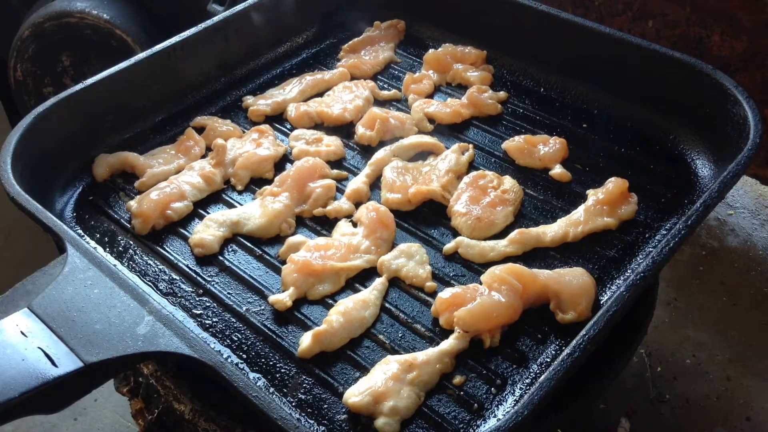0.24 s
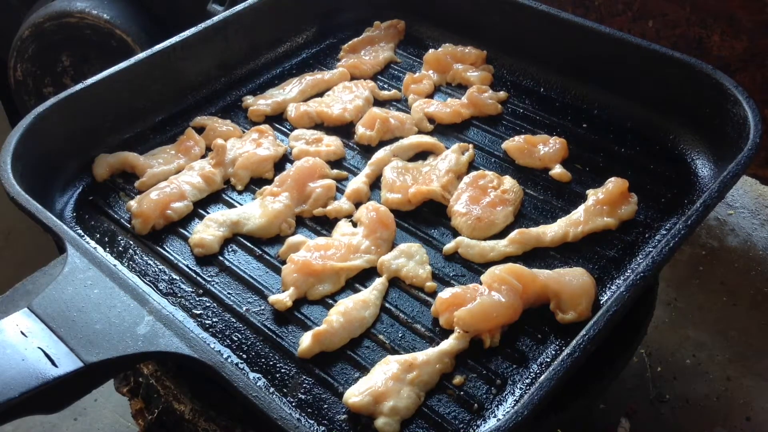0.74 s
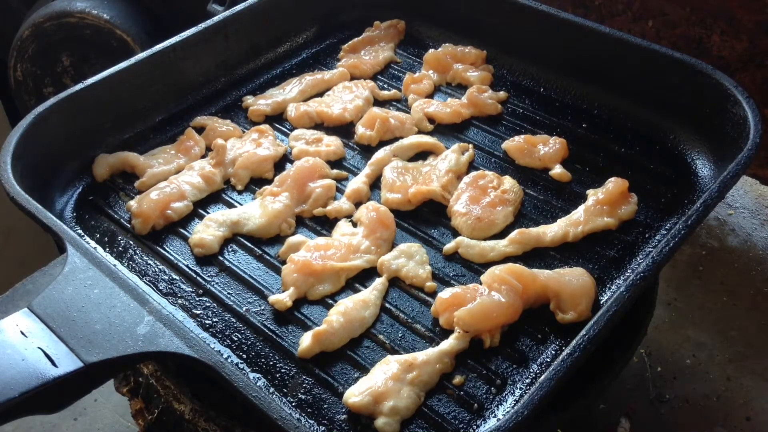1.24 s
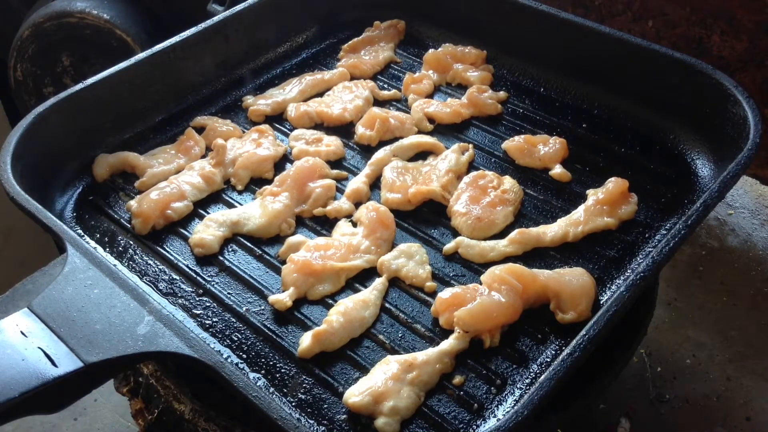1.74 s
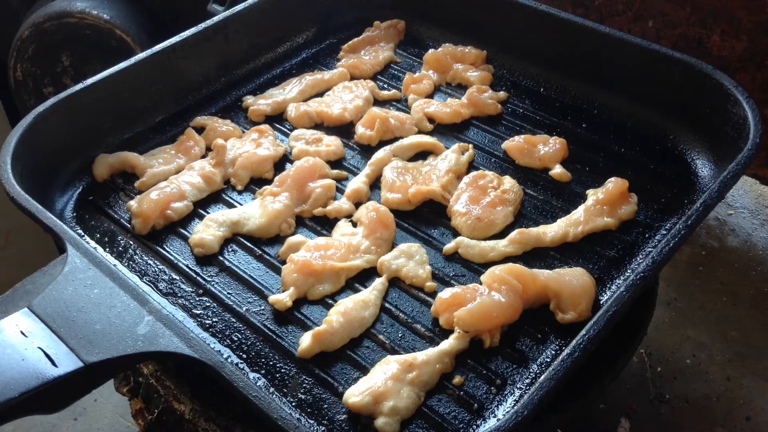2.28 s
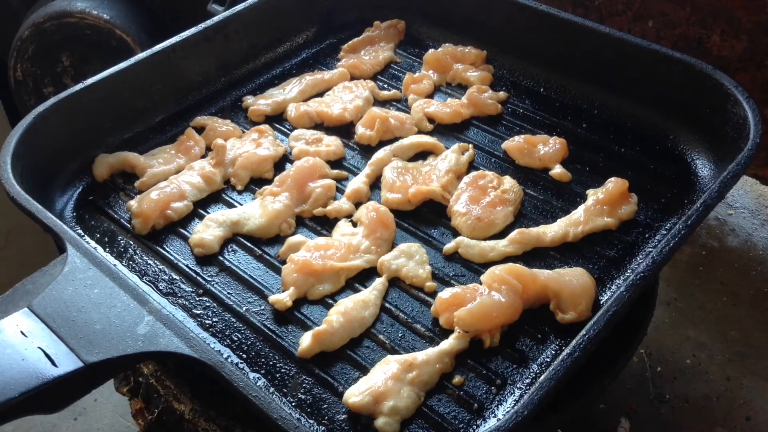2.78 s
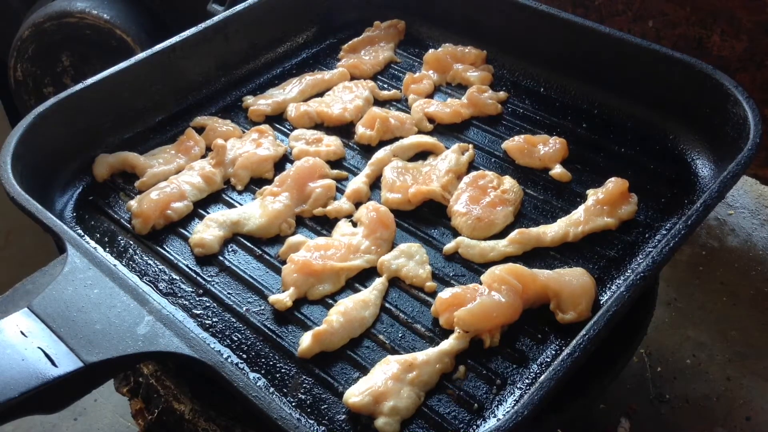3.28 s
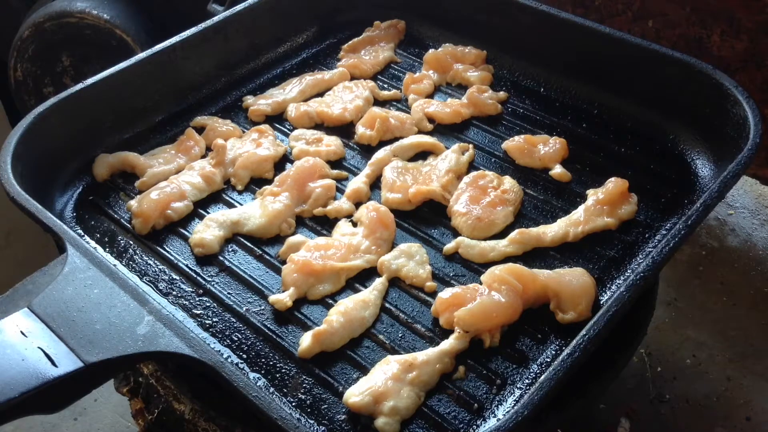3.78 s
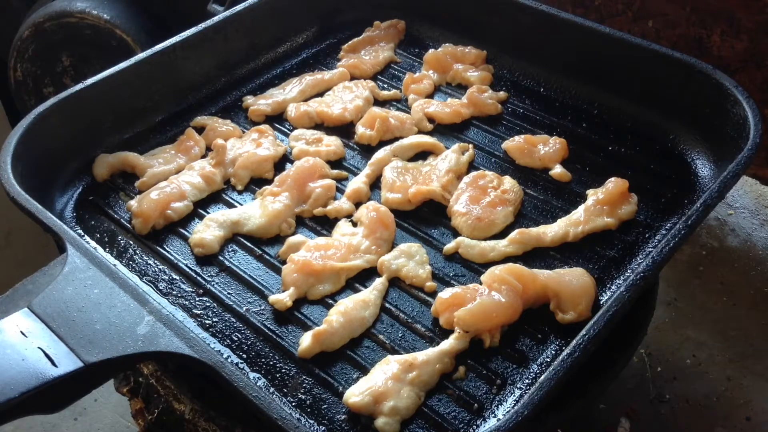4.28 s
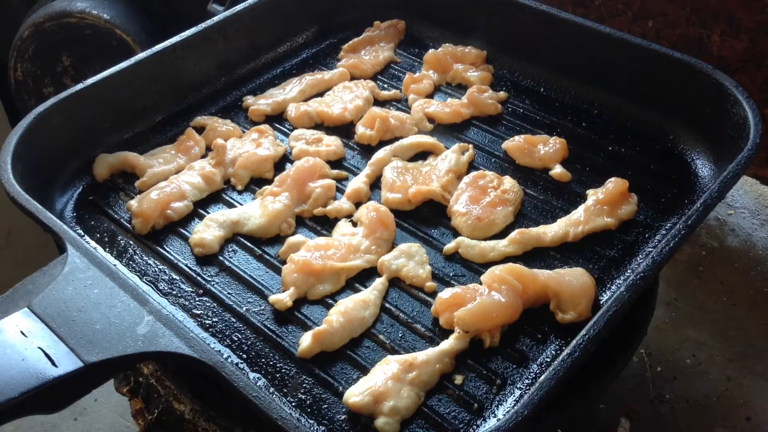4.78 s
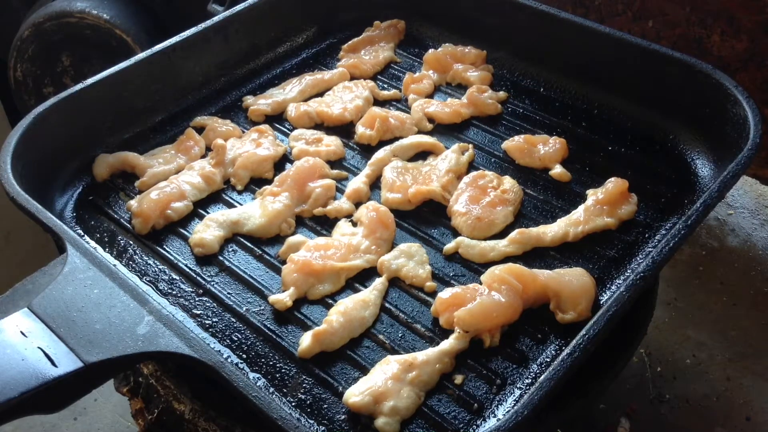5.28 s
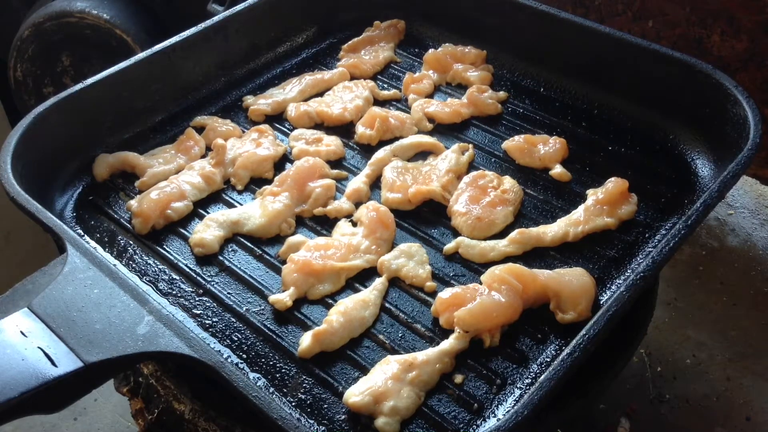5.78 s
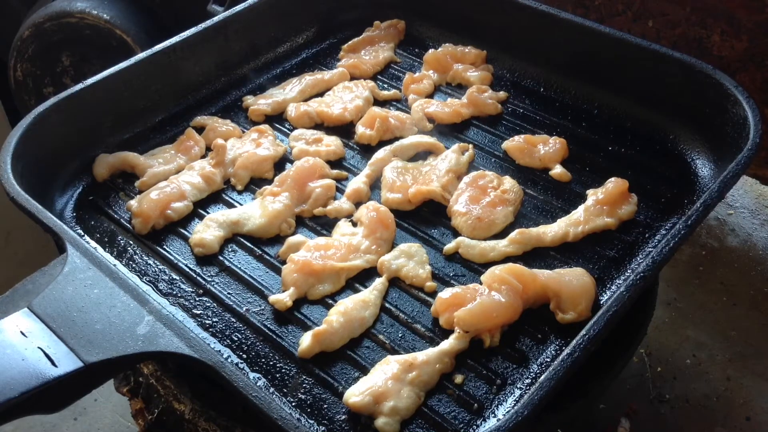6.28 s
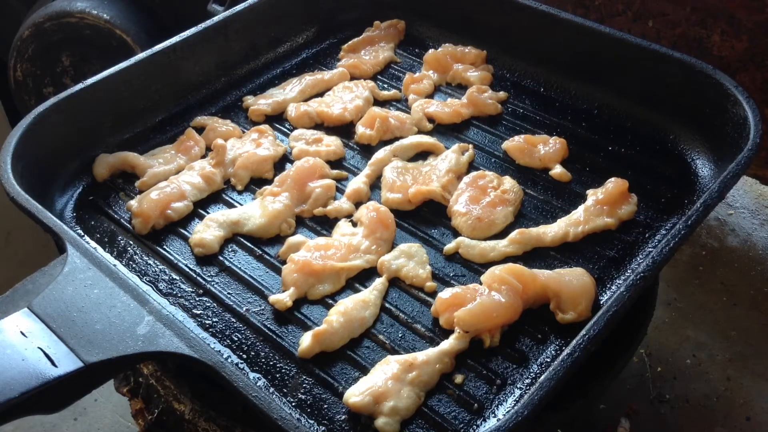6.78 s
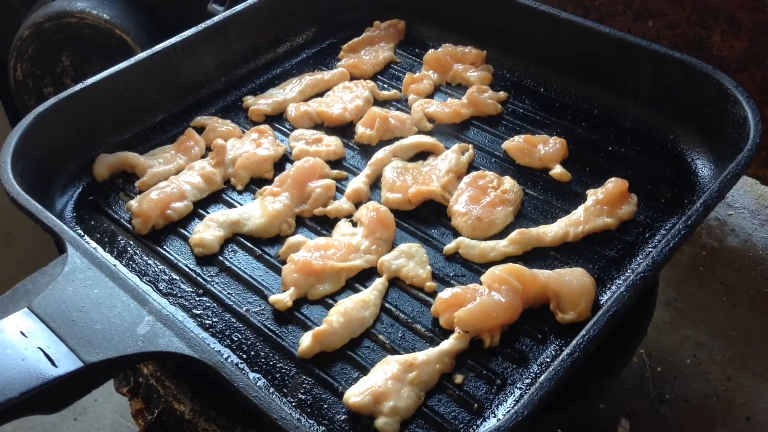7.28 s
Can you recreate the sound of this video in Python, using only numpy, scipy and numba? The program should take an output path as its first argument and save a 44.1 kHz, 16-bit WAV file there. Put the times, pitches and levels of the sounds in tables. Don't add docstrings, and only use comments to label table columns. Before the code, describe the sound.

For about seven and a half seconds, meat fries on a hot pan with the microphone close above it in a small kitchen. A bright, dense, steady sizzle fills the sound, mostly high steam hiss and countless bursting bubbles, fluttering in quick irregular gusts. Tiny ticks and sharp spits crackle constantly. Strong snaps stand out at 0.9 and 1.5 seconds; from 2.0 to 2.5 they crowd into a violent flurry, with splattery, clipped explosions. Another harsh pop lands at 3.0, then one at 3.1 makes the whole level duck and recover over about a second. The calmer stretch holds a soft, distant wooden knock at 4.5, while a faint wavering motor hum hides underneath. Boiling strengthens around 5.1, with a hard pop at 5.5. After an easing near 6.4, a snap at 6.7 causes a lighter dip, and sizzling continues undiminished. A very quiet low flame roar stays beneath.

```python
import sys
import numpy as np
from scipy import signal
from scipy.fft import rfft, irfft
from scipy.io import wavfile
from scipy.ndimage import uniform_filter1d
from numba import njit

SR = 44100
rng = np.random.default_rng(int(sys.argv[2]) if len(sys.argv) > 2 else 0)


def transcribe(u):
    v = np.clip(np.atleast_2d(u).T, -1, 1)
    q = np.round(v * 32767).astype(np.int16)
    wavfile.write(sys.argv[1], SR, q)


def field_ratio(decibels):
    return 10 ** (np.asarray(decibels, dtype=float) / 20)


N = 332514


def level(x, db):
    return x * field_ratio(db) / np.sqrt(np.mean(x ** 2))


def colour(x, table):
    hz, db = np.transpose(table)
    f = np.maximum(np.arange(4097) * SR / 8192, 1)
    cepstrum = irfft(np.log(field_ratio(np.interp(np.log(f), np.log(hz), db))))
    cepstrum[1:4096] *= 2
    cepstrum[4097:] = 0
    response = irfft(np.exp(rfft(cepstrum)))
    return signal.fftconvolve(x, response)[:N]


def walk(rate):
    hold = max(int(SR / rate), 2)
    steps = np.repeat(rng.standard_normal(N // hold + 1), hold)
    return 1.3 * uniform_filter1d(uniform_filter1d(steps, hold), hold)[:N]


@njit
def bursts(at, hz, size, rise, ring):
    out = np.zeros(N)
    for k in range(len(at)):
        first = max(int(at[k] - 4 * rise * SR / hz[k]), 0)
        last = min(int(at[k] + 6 * ring[k] * SR / hz[k]) + 1, N)
        for i in range(first, last):
            turns = (i - at[k]) * hz[k] / SR
            fade = np.exp(-(turns / rise) ** 2) if turns < 0 else np.exp(-turns / ring[k])
            out[i] -= size[k] * fade * np.cos(2 * np.pi * turns)
    return out


def drone():
    # (time [s], level [dB])
    swell = [
        (3.8, -63),
        (4.69, -55),
        (4.82, -72),
        (4.96, -58),
        (5.3, -63),
        (5.47, -52),
        (5.61, -81),
        (5.81, -57),
        (7.54, -69),
    ]
    s, db = np.transpose(swell)
    t = np.arange(N) / SR
    start_hz, sag_hz_per_s = 193.7, 2.5
    steady_hz = start_hz - sag_hz_per_s * (t - s[0])
    hz = steady_hz * (1 + 0.0197 * walk(6) + 0.013 * walk(15))
    level_db = np.interp(t, s, db, left=-90) + 2.0 * walk(5.74)
    return np.sqrt(2) * field_ratio(level_db) * np.sin(2 * np.pi * np.cumsum(hz) / SR)


def knock():
    # (time [s], peak [dB], pitch [Hz], ring [cycles])
    modes = [
        (4.536, -28, 300, 1),
        (4.5395, -27, 850, 2.5),
        (4.54, -31, 650, 1.3),
        (4.55, -35.5, 480, 9.7),
        (4.55, -41, 250, 3),
        (4.563, -33, 340, 2.7),
        (4.577, -35, 312, 3),
        (4.592, -41, 302, 5.5),
    ]
    s, db, hz, cycles = np.transpose(modes)
    return bursts(s * SR, hz, field_ratio(db + .5), 1.0, cycles)


def flame():
    # (frequency [Hz], level [dB])
    roar = [(35, -52), (60, -21), (102, -24), (133, -2.5), (184, 2.5), (238, 2), (269, -4.5), (328, -3),
            (371, -5.5), (413, -18), (430, -13), (560, -31), (950, -120)]
    return level(colour(rng.standard_normal(N), roar), -53.5) * field_ratio(0.35 * walk(6.6))


def boil_db():
    # (time [s], level [dB])
    heat = [(0.0, -21), (.45, -20), (.9, -20.9), (1.5, -19.5), (2.4, -19), (2.8, -21.5), (3.06, -19.5),
            (3.1, -23.5), (3.5, -22), (4.1, -21.2), (4.95, -20), (5.1, -18.5), (5.3, -20.5), (5.5, -19),
            (5.65, -20.5), (6.4, -21.5), (6.62, -19.5), (7.54, -19.5)]
    s, db = np.transpose(heat)
    return np.interp(np.arange(N) / SR, s, db) + 0.43 * walk(12)


def fizz(heat_db, count=30000):
    # (frequency [Hz], level [dB])
    sizzle = [(240, -60), (400, -27.5), (425, -37.5), (488, -21.5), (568, -14.5), (736, -13), (1250, -9.5),
              (1420, -12), (1980, -8), (3870, -4.5), (5580, -2), (6800, -2.5), (9950, 0.5), (13700, -1.5),
              (15200, -4)]
    spots, lowest_hz, span_hz, crowding = 6, 450, 19000, 1.6
    when, pitch, luck, life = rng.random((count, 4)).T
    at = when * (N - 1)
    moment = at.astype(int)
    hz = lowest_hz + span_hz * pitch ** crowding
    size_db = np.minimum(-3.5 * np.log(1 - luck), 10.5)

    gust_db = .5 * walk(30) + 1.2 * walk(250)
    patch_db = np.array([0.96 * walk(11) + 0.98 * walk(70) for _ in range(spots)])
    patch_db[0] -= 0.4 * (heat_db - heat_db.mean())
    spot = (spots * pitch).astype(int)

    even = np.sqrt(hz * (pitch + .05) ** .6)
    size = field_ratio(size_db + gust_db[moment] + patch_db[spot, moment]) * even
    swarm = bursts(at, np.minimum(hz, .45 * SR), size, 0.3, 0.22 + 0.91 * life ** 2)

    jet = rfft(rng.standard_normal(N))
    edges_hz = lowest_hz + span_hz * (np.arange(1, spots) / spots) ** crowding
    band = np.searchsorted(edges_hz, np.arange(len(jet)) * SR / N)
    steam = np.zeros(N)
    for k in range(spots):
        steam += irfft(jet * (band == k), N) * field_ratio(0.3 * (gust_db + patch_db[k]))
    mixed = level(swarm, 0) + level(steam, 1.5)
    return field_ratio(heat_db) * level(colour(mixed, sizzle), -0.41)


def duck_db():
    # (time [s], depth [dB])
    ducks = [
        (3.0872, 3.5),
        (6.6957, 2.0),
    ]
    recover_s = 1
    t = np.arange(N) / SR
    return -sum(depth_db * (t > s) * np.exp(-np.abs(t - s) / recover_s) for s, depth_db in ducks)


def crowd(heat_db, loud, per_s, over_db, scatter_db, centre_hz, octaves):
    count = int(per_s * N / SR)
    s = .01 + rng.random(count) * (N / SR - .02)
    luck, pitch = rng.standard_normal((count, 2)).T
    peak_db = (heat_db + duck_db())[(s * SR).astype(int)] + over_db + scatter_db * luck
    return np.vstack([loud, np.transpose([s, peak_db, centre_hz * 2 ** (octaves * pitch)])])


def pan_tail(s, hz, size, spread_s, tail_db, count=8):
    late, shift, sign = rng.random((len(s), count, 3)).transpose(2, 0, 1)
    delay = -spread_s * np.log(1 - late) + .0002
    small = size[:, None] * field_ratio(tail_db) * np.exp(-delay / (2 * spread_s)) * (2 * sign - 1)
    tail_hz = hz[:, None] * 2 ** (0.83 * shift - .6)
    return (s[:, None] + delay).ravel(), tail_hz.ravel(), small.ravel()


def spits(table, gain_db, rise, ring, tail_db):
    s, peak_db, hz = np.transpose(table)
    size = field_ratio(peak_db + gain_db - duck_db()[(s * SR).astype(int) - 20])
    tail_s, tail_hz, tail_size = pan_tail(s, hz, size, 0.0013, tail_db)
    s, hz, size = np.append(s, tail_s), np.append(hz, tail_hz), np.append(size, tail_size)
    rings = ring * (1 + rng.random(len(s)))
    pops = bursts(s * SR, np.minimum(hz, .45 * SR), size, rise, rings)
    return signal.sosfilt(signal.butter(3, 600, "high", fs=SR, output="sos"), pops)


def ticks(heat_db):
    table = crowd(heat_db, np.empty((0, 3)), per_s=22, over_db=12, scatter_db=2.4,
                  centre_hz=13800, octaves=.1)
    return spits(table, gain_db=0, rise=.8, ring=.8, tail_db=-9)


def deep_spits(heat_db):
    # (time [s], peak [dB], bubble pitch [Hz])
    loud = [(0.5774, -16, 3000), (0.7635, -15, 2600), (0.8593, -13, 2600), (0.9326, -13, 2900),
            (1.0935, -16, 2800), (1.5085, -16, 3100), (1.8524, -15, 2900), (1.8842, -16, 3100),
            (2.0117, -13, 2900), (2.0647, -14, 2500), (2.0955, -12, 2800), (2.1301, -10, 2600),
            (2.1613, -12, 2800), (2.3518, -17, 2100), (2.4063, -16, 2300), (2.5521, -17, 2000),
            (2.9902, -9, 2800), (3.0871, -16, 3200), (3.6065, -20, 3400), (3.9338, -18, 3000),
            (4.1053, -19, 2600), (4.4882, -15, 2400), (4.5407, -17, 2100), (4.6253, -17, 2900),
            (5.5041, -17, 2800), (6.017, -18, 2500), (6.6955, -16, 3900), (6.901, -17, 3700),
            (7.14, -17, 2900), (7.2767, -16, 3200)]
    table = crowd(heat_db, loud, per_s=7, over_db=2.5, scatter_db=.8, centre_hz=2900, octaves=.18)
    return spits(table, gain_db=.5, rise=0.47, ring=0.25, tail_db=-12)


def middle_spits(heat_db):
    # (time [s], peak [dB], bubble pitch [Hz])
    loud = [(0.5774, -13, 5900), (1.2755, -14, 5400), (1.449, -13, 5700), (1.5091, -14, 6000),
            (1.5269, -14, 5800), (1.8842, -13, 5900), (2.0655, -14, 5100), (2.0955, -13, 5500),
            (2.3306, -11, 5300), (2.4184, -8, 7000), (2.5358, -14, 5400), (3.6067, -15, 5100),
            (3.9962, -16, 5800), (4.52, -13, 5100), (5.5041, -13, 5700), (5.5957, -11, 5200),
            (6.1194, -15, 5400), (6.2903, -15, 4800), (6.5503, -15, 5100), (6.901, -12, 5100),
            (7.2767, -14, 5400)]
    table = crowd(heat_db, loud, per_s=3, over_db=4.5, scatter_db=.6, centre_hz=5600, octaves=.12)
    return spits(table, gain_db=-.5, rise=.8, ring=.9, tail_db=-10)


def sharp_spits(heat_db):
    # (time [s], peak [dB], bubble pitch [Hz])
    loud = [(0.0999, -3, 10600), (0.1927, -4, 9400), (0.5066, -4, 9200), (0.5815, -4, 10700),
            (0.8592, -3, 8800), (0.9154, -3, 10200), (0.9326, -3, 9900), (1.2755, -4, 10100),
            (1.3259, -3.5, 10700), (1.4271, -4, 9600), (1.5195, -4, 8700), (1.5438, -3, 10200),
            (1.5485, 0, 11100), (1.8508, -3, 10900), (1.9676, -1, 10900), (2.026, -3, 9500),
            (2.1301, -5, 7800), (2.2595, -4, 9500), (2.276, -1, 8200), (2.3927, -2, 9400),
            (2.4529, -2, 9000), (2.6993, -1.5, 10700), (2.9907, -4, 8700), (3.0871, -2, 8500),
            (5.4089, -4, 10600), (5.5095, -2, 8500), (5.524, -3, 10300), (6.62, -4, 9600),
            (6.6955, -2, 7600), (7.3011, -4, 10600)]
    table = crowd(heat_db, loud, per_s=17, over_db=13.5, scatter_db=1.2, centre_hz=10000, octaves=.13)
    return spits(table, gain_db=.7, rise=.8, ring=.7, tail_db=-9)


def bangs():
    # (time [s], peak [dB], bubble pitch [Hz])
    extra_bursts = [(.8592, -9, 7000), (1.5485, -12, 9000), (2.1292, -6, 10900), (2.1301, -9, 4300),
                    (2.1302, -22, 1300), (2.1613, -6, 6000), (2.276, -11, 5600), (2.4433, -5, 9100),
                    (2.454, -7, 10100), (2.9902, -2, 5300), (2.9906, -5, 5200), (3.0871, -11, 6200),
                    (5.5095, -9, 6500), (6.6955, -15, 5800)]
    return spits(extra_bursts, gain_db=0, rise=.5, ring=.5, tail_db=-6)


def scene():
    heat_db = boil_db()
    background = drone() + knock() + flame()
    popping = ticks(heat_db) + deep_spits(heat_db) + middle_spits(heat_db) + sharp_spits(heat_db) + bangs()
    return (background + fizz(heat_db) + popping)[None]


def band_limit(x):
    return signal.sosfilt(signal.butter(12, 16500, fs=SR, output="sos"), x)


def record(dry):
    ceiling, top_hz = .9, 15330
    bass_cut = signal.butter(2, 100, "high", fs=SR, output="sos")
    x = signal.sosfilt(bass_cut, dry) * field_ratio(duck_db())
    tones = rfft(np.clip(x, -ceiling, ceiling))
    tones[:, int(top_hz * N / SR):] = 0
    return band_limit(irfft(tones, N))


dry = scene()
out = record(dry)
transcribe(out)
```